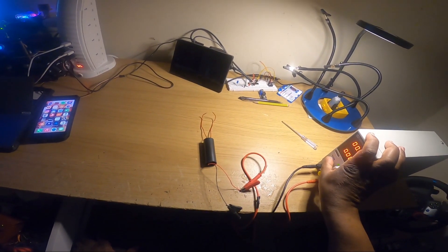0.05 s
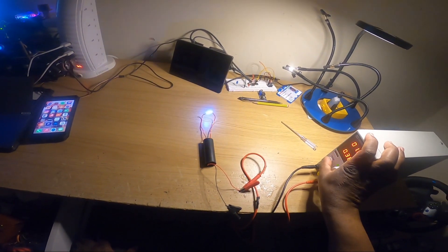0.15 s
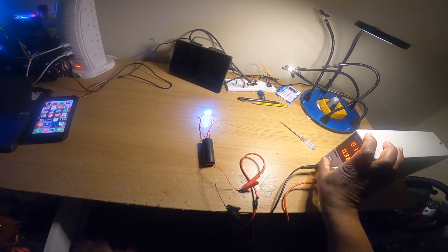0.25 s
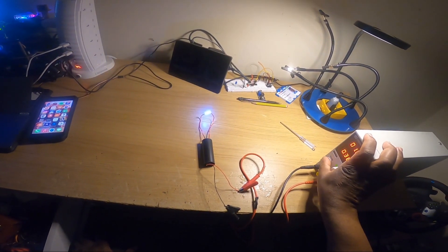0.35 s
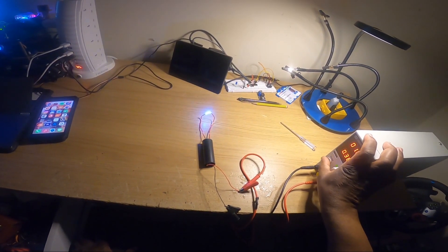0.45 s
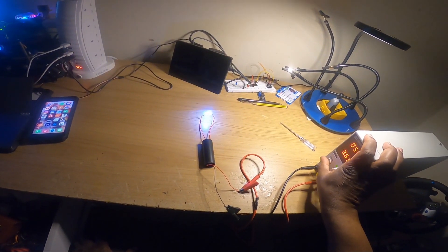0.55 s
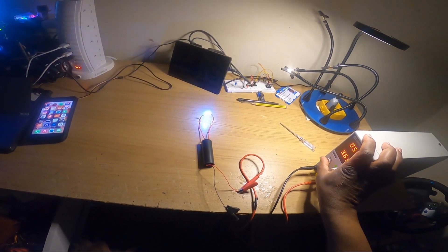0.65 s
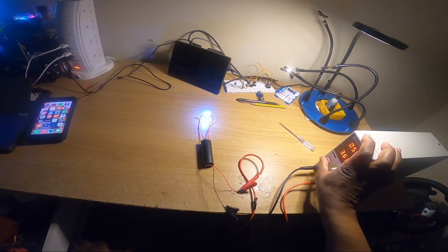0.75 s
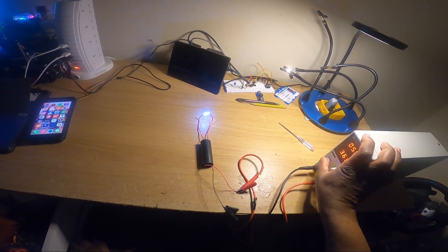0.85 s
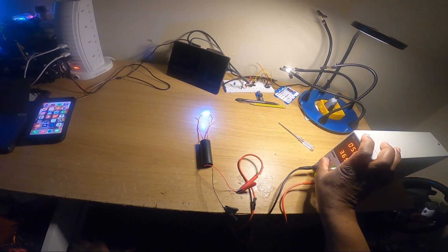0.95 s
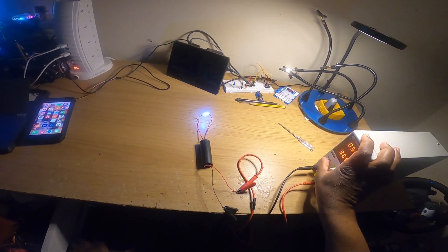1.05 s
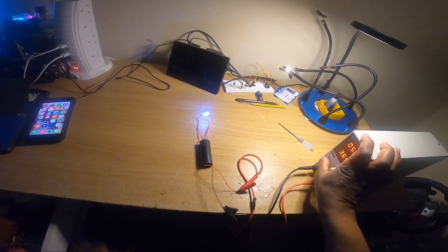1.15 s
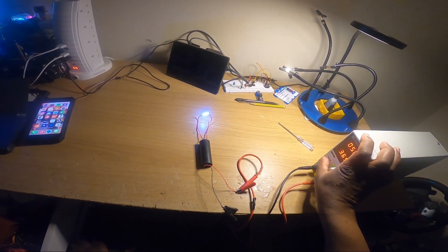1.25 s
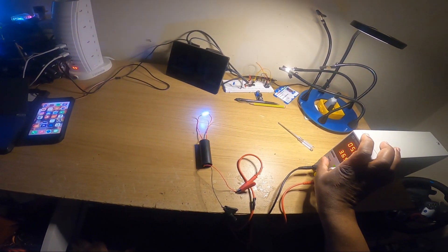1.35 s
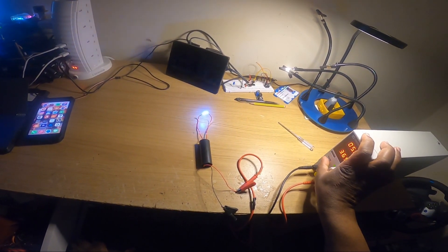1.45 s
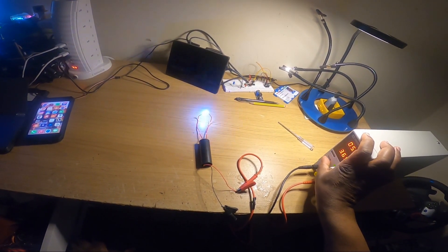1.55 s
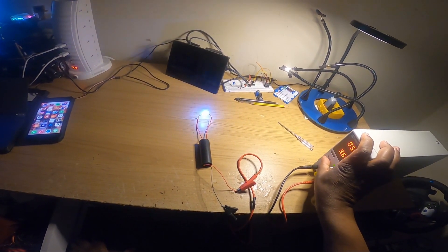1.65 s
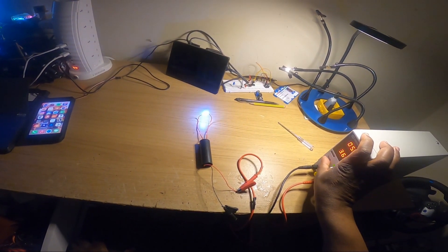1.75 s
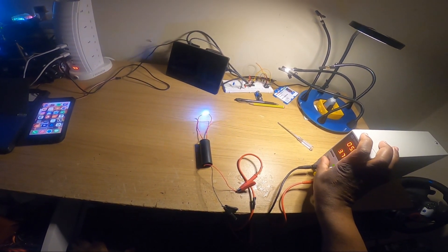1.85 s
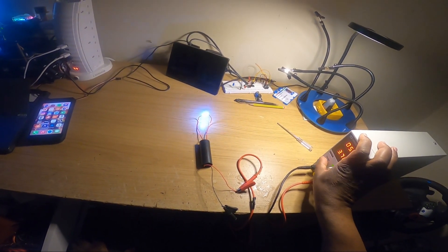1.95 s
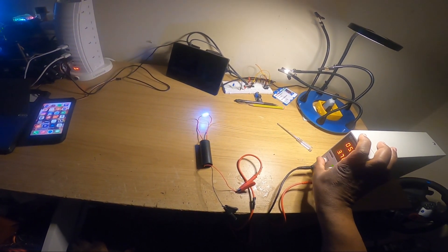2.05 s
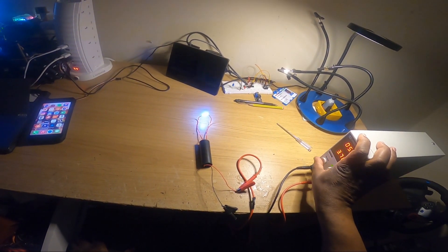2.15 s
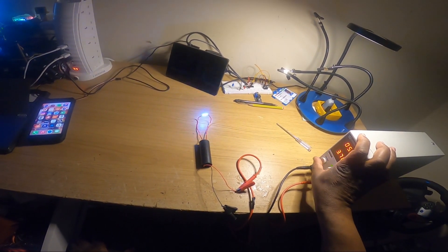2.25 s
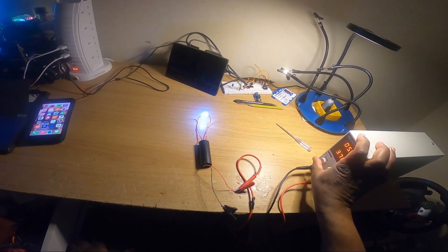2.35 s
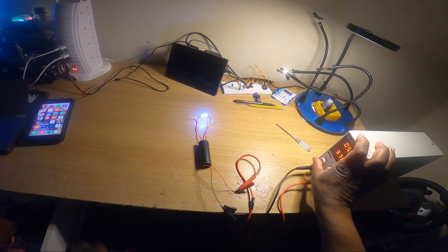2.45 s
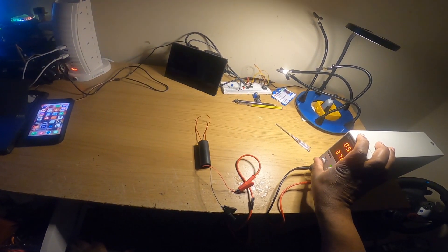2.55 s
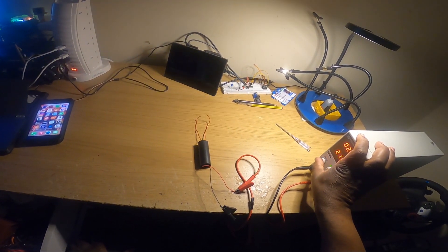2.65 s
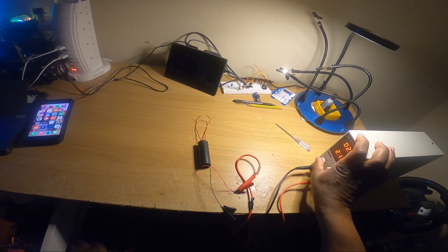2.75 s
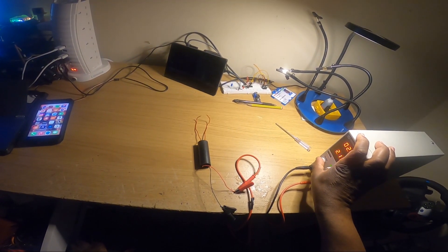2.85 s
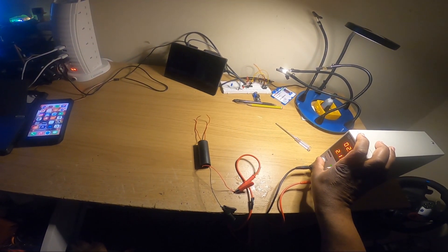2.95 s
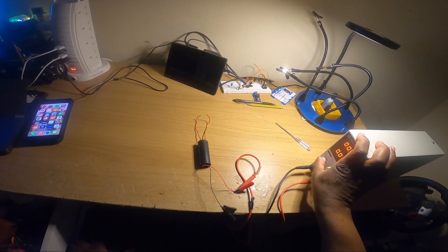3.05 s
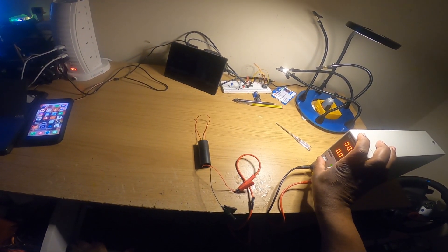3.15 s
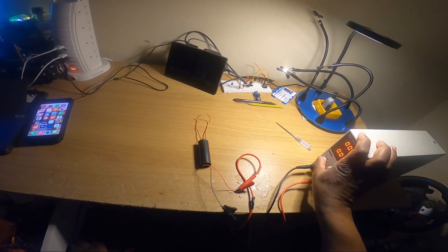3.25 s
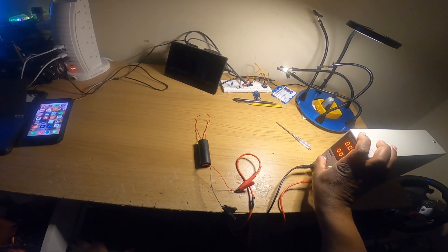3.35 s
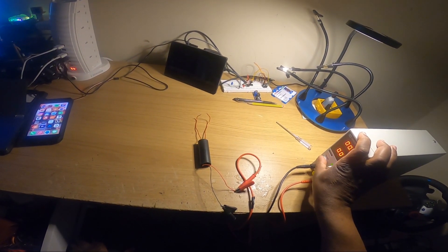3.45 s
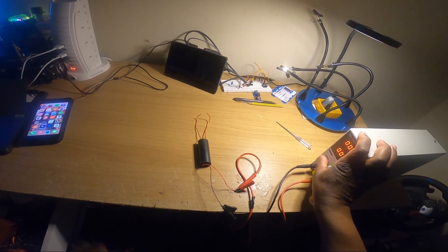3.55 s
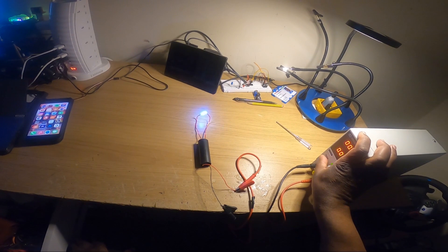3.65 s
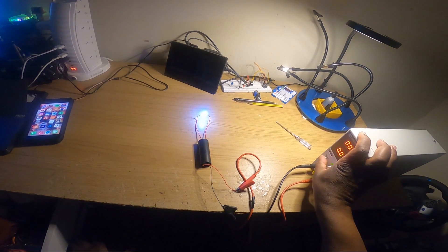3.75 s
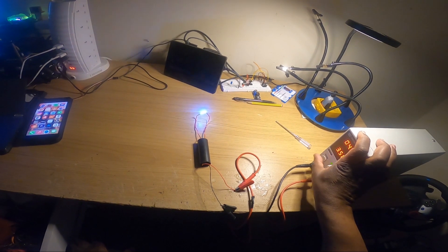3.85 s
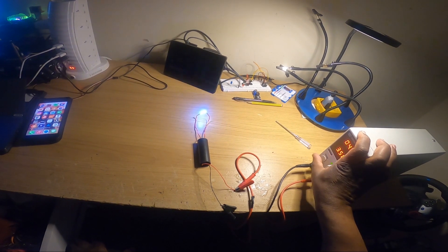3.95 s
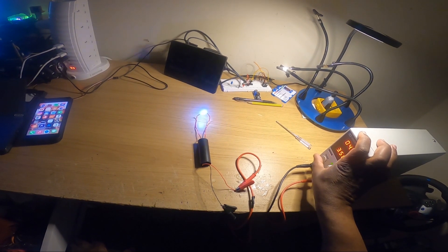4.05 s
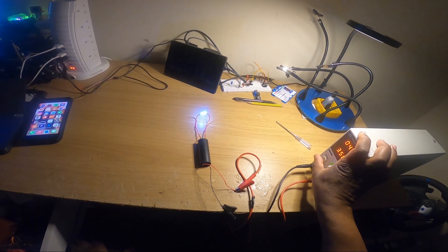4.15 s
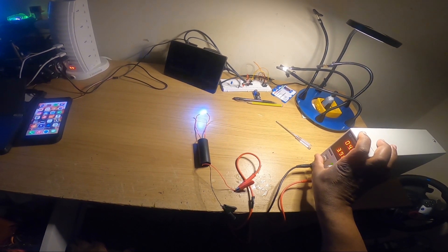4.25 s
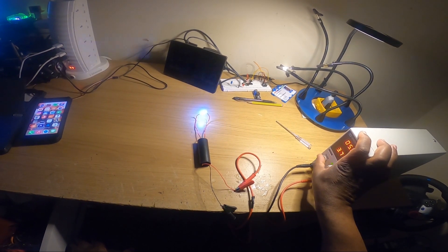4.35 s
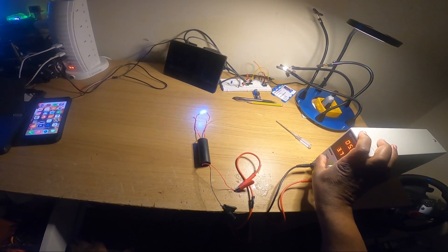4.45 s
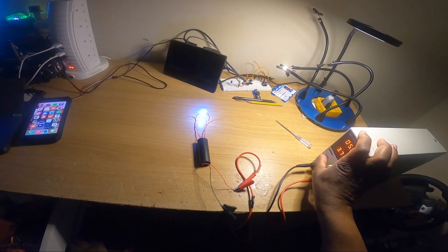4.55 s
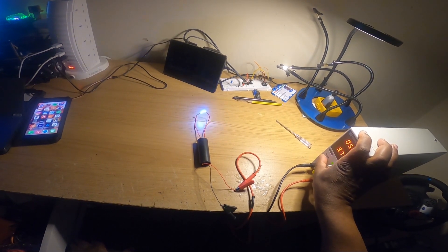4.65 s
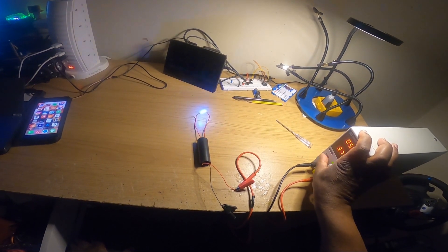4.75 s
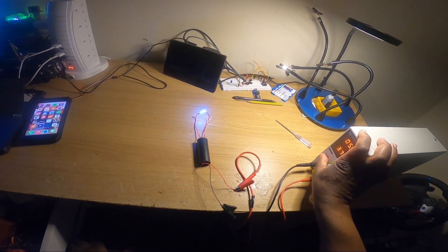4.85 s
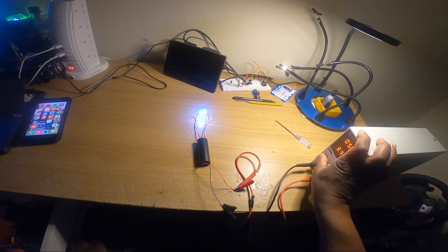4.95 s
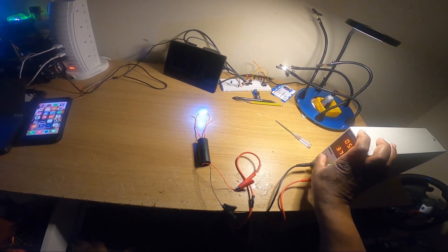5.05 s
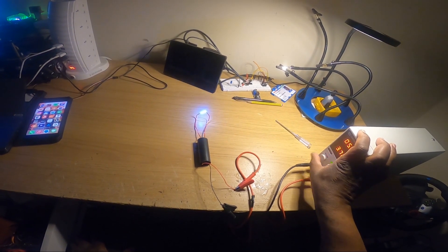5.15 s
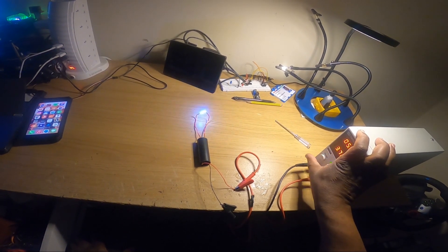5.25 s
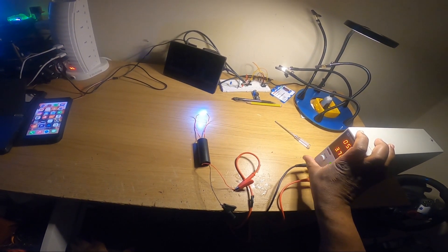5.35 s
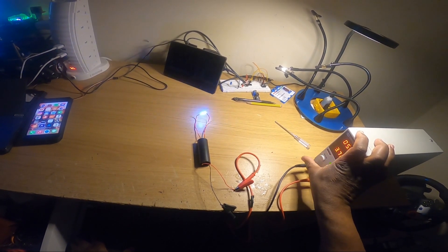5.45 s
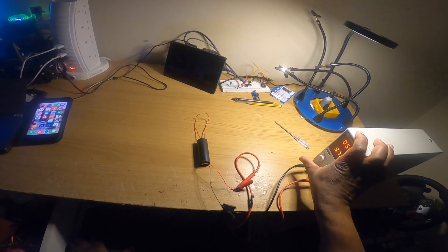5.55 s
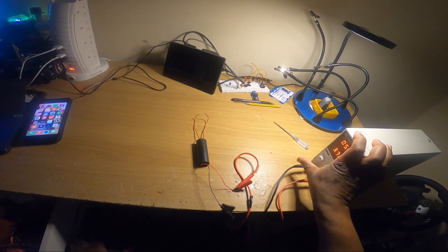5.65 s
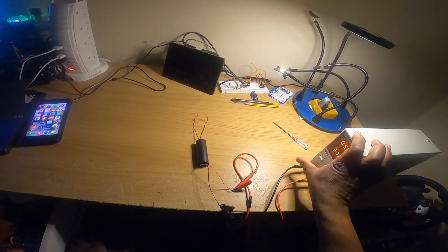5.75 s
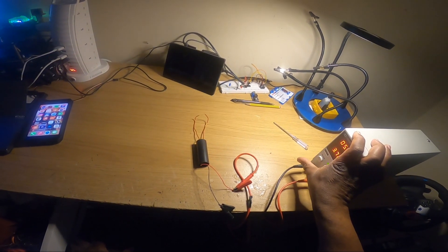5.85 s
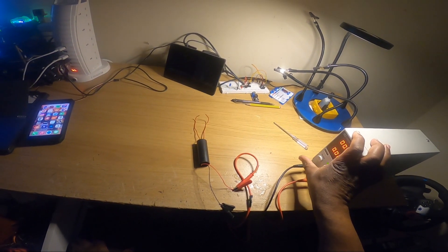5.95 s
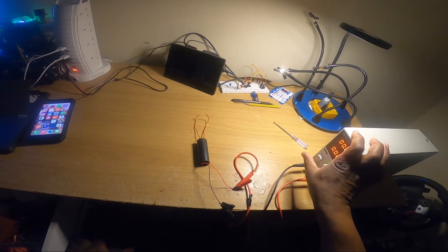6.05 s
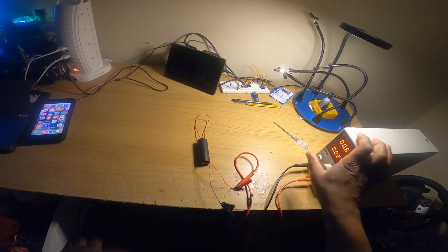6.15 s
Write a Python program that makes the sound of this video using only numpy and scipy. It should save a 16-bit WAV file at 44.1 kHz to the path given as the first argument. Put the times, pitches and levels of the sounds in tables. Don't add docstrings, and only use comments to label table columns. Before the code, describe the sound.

A firm plastic click and a softer tick, then a high-voltage coil on a wooden bench erupts into a harsh, rapid crackling buzz for over two seconds. It stops dead; faint release ticks and low rumble fill a second's gap. A second similar burst follows, then near silence. Close microphone, small room, thumped and slightly overloaded by each spark.

```python
import sys
import numpy as np
from scipy import signal
from scipy.fft import rfft, irfft
from scipy.io import wavfile
from scipy.ndimage import uniform_filter1d

SR = 44100
rng = np.random.default_rng(int(sys.argv[2]) if len(sys.argv) > 2 else 0)


def generate_wav(sig):
    pcm = np.round(np.clip(np.atleast_2d(sig).T, -1, 1) * 32767).astype(np.int16)
    wavfile.write(sys.argv[1], SR, pcm)


def undo_db(level):
    steps = np.asarray(level, float) / 20
    return 10 ** steps


N = 273541

# time_s, rate_sparks_per_s, wander_0_to_1 (share of weak wandering strikes)
SPARK_BURSTS = [
    [(0.3005, 54.0, 0.06), (0.3772, 70.74, 0.03), (0.3971, 90.59, 0.53), (0.9036, 78.78, 0.26),
     (1.0257, 86.53, 0.41), (1.3012, 86.05, 0.16), (1.4056, 77.86, 0.07), (2.0231, 91.37, 0.51),
     (2.6131, 81.69, 0.38)],
    [(3.7288, 51.09, 0.03), (3.833, 82.5, 0.59), (4.0702, 84.07, 0.46), (4.09, 90.15, 0.45),
     (4.7264, 89.52, 0.6), (5.2881, 76.86, 0.06), (5.409, 83.1, 0.11), (5.6113, 75.44, 0.03),
     (5.703, 76.27, 0.04)],
]


def evened(x):
    return x / np.sqrt(np.mean(x ** 2) + 1e-20)


def read(points, hz):
    f, value = np.transpose(points)
    return np.interp(np.log(hz + 1), np.log(f + 1), value)


def shaped(x, points):
    hz = np.fft.rfftfreq(x.shape[-1], 1 / SR)
    return irfft(rfft(x) * undo_db(read(points, hz)), x.shape[-1])


def train(times_s, sizes):
    return np.bincount(np.round(times_s * SR).astype(int), sizes, N)[:N]


def struck(times_s, sizes, response):
    return signal.oaconvolve(train(times_s, sizes), response)


def burst(u, width_s, hz):
    return np.exp(-(u / width_s) ** 2) * np.cos(2 * np.pi * hz * u)


def firing(rows):
    crack_level_db, dip_level_db = -29, -21
    fresh_crack_db, fresh_dip_db, settle_s = 2.5, 1, .075
    wander_db, first_db = -3, 6.2
    early_s, jitter_s, pull_back = .0008, .0011, .3

    time_s, rate, wander = np.transpose(rows)
    clock_s = np.arange(time_s[0], time_s[-1], 1 / SR)
    fired = np.cumsum(np.interp(clock_s, time_s, rate)) / SR
    k = np.arange(round(fired[-1]) + 1)
    due_s = np.interp(k, fired, clock_s)
    wander = np.interp(due_s, time_s, wander)
    timing, place, miss, landing = rng.random((len(k), 4)).T

    missed = (miss < wander) & (k > 0) & (k < k[-1])
    error_s = jitter_s * np.sqrt(12) * (timing - .5) * (.4 + wander)
    error_s = error_s - early_s * (missed - wander)
    ends = np.clip(np.minimum(k, k[-1] - k) / 4, 0, 1)
    t = due_s + ends * signal.lfilter([1], [1, pull_back - 1], error_s)

    fresh = np.exp(-(t - t[0]) / settle_s)
    charge_db = 300 * (np.diff(t, prepend=t[0] - .012) - .012)
    crack_db = crack_level_db + fresh_crack_db * fresh + wander_db * wander + first_db * (k == 0)
    crack = undo_db(crack_db + charge_db.clip(-2, 1) + 2.4 * (place - .5))
    dip = undo_db(dip_level_db + fresh_dip_db * fresh)
    weak = np.where(landing < .07, -.4, .2 + .5 * landing)
    landed = np.where(missed, weak, .8 + .36 * landing)
    return t, crack, dip, landed, place


def tail(colour, ring=1.7, build_s=0.00092):
    # centre_hz, width_hz, level_db
    bench_modes = [(3445, 1400, -11), (4773, 160, -4), (5950, 96, -24), (6686, 330, -7), (6960, 76, -32.5),
                   (7580, 140, -3), (7960, 150, -16), (9720, 160, 8.5), (10710, 220, -4)]
    # frequency_hz, t60_s
    decay = [(300, .33), (1000, .54), (2800, .56), (4700, .46), (8500, .4), (12500, .25)]
    size = SR * 3 // 5
    age_s = np.arange(size) / SR
    f = np.fft.rfftfreq(size, 1 / SR)
    bumps = 1 + sum(ring * undo_db(db) / (1 + (2 * (f - c) / w) ** 2) for c, w, db in bench_modes)
    noise = irfft(rfft(shaped(rng.standard_normal(size), colour)) * bumps, size)
    hz, t, z = signal.stft(noise, SR, nperseg=256)
    fade = undo_db(-60 * t / read(decay, hz)[:, None])
    x = signal.istft(z * fade, SR, nperseg=256)[1][:size]
    x = x * (1 - np.exp(-age_s / build_s))
    x = x * undo_db(-22 * (age_s / .4) ** 3)
    return x / np.linalg.norm(x)


def cracks(t, size, place):
    # frequency_hz, spread_s, level_db
    shock_bands = [(8300, 0.00039, -2.5), (3640, 0.00033, -11), (10520, 0.00034, -11), (6170, 0.00037, -9),
                   (678, 0.00061, -11), (7790, 0.00019, -6.5), (4710, 0.00074, -9.5),
                   (3264, 0.00059, -12.5), (7230, 0.00042, -12), (6050, 0.00021, -23),
                   (2330, 0.00029, -13.5), (3240, 0.00057, -16), (11200, 0.00013, -21.5),
                   (1735, 0.0004, -20)]
    arrivals_s = 0, -.0001, 0, 0, .0005, .0009, .0011, -.0001, .0037, .0047, -.0003, .0017, .0012, -.0003
    # frequency_hz, density_db_per_hz
    wet_colour = [(200, -42.5), (400, -8), (700, -2.5), (1000, -3.5), (1500, -5), (2200, -3.5),
                  (3300, -3.5), (8200, -2.5), (10500, -11.5), (12500, -10), (15500, -32)]
    # frequency_hz, side_over_mid_db
    side_colour = [(60, -50), (150, -40), (300, -28), (700, -26), (1400, -31), (2800, -32), (5600, -30),
                   (10000, -27), (14000, -20)]

    lead = 64
    u = (np.arange(400) - lead) / SR
    near = sum(undo_db(db) * burst(u - s, w, hz) for (hz, w, db), s in zip(shock_bands, arrivals_s))
    direct = undo_db(18.5) * struck(t, size, near)[lead:N + lead]

    size = np.minimum(size, 1.5 * np.median(size))
    first_s, second_s = [rows[0][0] for rows in SPARK_BURSTS]
    age_s = t - np.where(t < second_s, first_s, second_s)
    air = burst(u, 0.00027, 13800)
    direct = direct + undo_db(3.5) * struck(t, size / (1 + (age_s / 0.26) ** 4), air)[lead:N + lead]

    share = np.clip(0.53 * place, 0, 1)
    gains = np.sqrt(1 - share), np.sqrt(share)
    wet = sum(struck(t, size * g, tail(wet_colour))[:N] for g in gains)
    side = shaped(struck(t, size, tail(wet_colour))[:N], side_colour)
    side = undo_db(38) * side * np.array([[1], [-1]])
    return direct + undo_db(28.0) * wet + side


def dips(t, size, landed, place):
    out = np.zeros(N)
    late = 1 - np.clip(abs(landed), 0, 1)
    for s, depth, lag in zip(t, size * landed, late):
        u = np.linspace(0, 1, int((.0044 + .003 * lag) * SR))
        start = int((s + .0006 + .0018 * lag) * SR)
        end = start + len(u)
        out[start:end] -= depth * np.sin(np.pi * u ** 0.67) ** 2
        out[end:end + len(u)] += .9 * lag * depth * np.sin(np.pi * u) ** 2

    u = np.arange(-90, 90) / SR
    snap_size = size * landed ** 2 * (0.36 + 1.5 * place ** 2)
    out += undo_db(-13) * struck(t - .0018, snap_size, burst(u, .0005, 720))[:N]

    gap_s = uniform_filter1d(np.diff(t, prepend=0).clip(0, .014), size=21)
    hurried = np.clip((.0119 - gap_s) / .0008, 0, 1)
    out += undo_db(-15.5) * struck(t - .0024, size * hurried * place, burst(u, 0.0013, 1350))[:N]

    u = np.arange(4000) / SR
    wobble = undo_db(-60 * u / 0.074) * np.sin(2 * np.pi * 108 * u)
    out -= undo_db(5.5) * struck(t, (size - np.median(size)).clip(0), wobble)[:N]

    turn, sharp = 2 * np.pi * 30 / SR, 1.05
    b, a = signal.bilinear([1, 0, 0], [1, turn / sharp, turn ** 2], fs=1)
    return undo_db(11.5) * signal.lfilter(b, a, out)


def button():
    # start_s, peak_db, brightness_db
    clicks = [
        (0.038, -15.5, -7),
        (0.188, -27.5, -12),
        (3.008, -38.5, -28),
        (3.029, -41, -33),
        (3.071, -36, -30),
        (3.094, -40, -43),
        (3.137, -41.5, -27),
        (3.612, -59, -50),
    ]
    # frequency_hz, level_db, t60_s
    modes = [(700, 0, .035), (640, -6, .025), (830, -6, .02), (1020, -3, .03), (1250, -6, .02),
             (1500, -7, .02), (2300, -10, .015)]
    # frequency_hz, density_db_per_hz
    snap_colour = [(300, -24), (1000, -13), (2500, -14.5), (4500, -5), (5400, -15.5), (6400, -9.5),
                   (10000, -20), (15500, -29)]
    u, knock, snap = np.arange(6000) / SR, np.zeros(N), np.zeros(N)
    for s, db, bright_db in clicks:
        ring = sum(undo_db(d - 60 * u / t60) * np.sin(2 * np.pi * hz * rng.uniform(1.0, 1.03) * u)
                   for hz, d, t60 in modes)
        tilt = [(2500, 0), (7000, bright_db + 8)]
        noise = evened(shaped(rng.standard_normal(len(u)), snap_colour))
        puff = undo_db(-4.0 - 60 * u / 0.025) * shaped(noise, tilt)
        span = slice(round(s * SR), round(s * SR) + len(u))
        knock[span] += undo_db(db - 6) * ring * (1 - np.exp(-u / 0.0017))
        snap[span] += undo_db(db - 1 + .3 * bright_db) * puff * (1 - np.exp(-u / 0.00084))
    room = tail([(100, 0), (15000, 0)], ring=0)
    room = room * undo_db(6.5 - 110 * np.arange(len(room)) / SR)
    return knock + snap + signal.oaconvolve(undo_db(-8.5) * knock + undo_db(-4) * snap, room)[:N]


def whine():
    # time_s, pitch_hz, level_db
    glide = [(0.231, 8300, -75), (.25, 8150, -60), (.268, 8280, -75), (0.279, 8900, -66.5)]
    s, hz, db = np.transpose(glide)
    t = np.arange(N) / SR
    phase = 2 * np.pi * np.cumsum(np.interp(t, s, hz)) / SR
    return undo_db(np.interp(t, s, db, -120, -120)) * np.sin(phase)


def background(loud):
    # time_s, spread_s, rumble_db, drone_db
    stirs = [
        (0, 0.12, -51, -66),
        (.27, 0.065, -46.5, -65),
        (2.74, 0.13, -64, -64.5),
        (3.2, 0.3, -53.5, -81),
        (2.97, .08, -63, -80.5),
        (3.71, .05, -51.5, -57),
        (5.78, 0.083, -64.5, -64),
    ]
    # frequency_hz, density_db_per_hz
    rumble_colour = [(12, -23.5), (25, -10.5), (48, 5), (80, -11), (120, -35), (500, -77)]
    drone_colour = [(60, -30), (110, 0), (160, 1), (260, -12.5), (400, -18.5), (1000, -36.5)]
    fan_colour = [(300, -10), (900, -10), (1450, 0), (1900, -12), (2600, -8), (3200, -20), (6000, -32),
                  (15000, -45)]
    t = np.arange(N) / SR
    s, spread, rumble_db, drone_db = np.transpose(stirs)
    swell = np.exp(-((t[:, None] - s) / spread) ** 2)
    rumble_level = undo_db(-72.5) + swell @ undo_db(rumble_db)
    drone_level = undo_db(-74) + swell @ undo_db(drone_db)
    rumble = rumble_level * evened(shaped(rng.standard_normal(N), rumble_colour))
    drone = drone_level * evened(shaped(rng.standard_normal(N), drone_colour))
    last_loud_s = np.maximum.accumulate(np.where(abs(loud) > .05, t, 0))
    gate = undo_db(-16) + uniform_filter1d((t - last_loud_s < .29) * 1., int(.08 * SR))
    fan = undo_db(-62.0) * gate * evened(shaped(rng.standard_normal(N), fan_colour))
    return rumble + drone + fan


def smeared(x):
    frame, grid = 2048, 435
    pad = frame // 2 - grid
    window = np.sin(np.pi * (np.arange(frame) + .5) / frame)
    hz, t, z = signal.stft(np.pad(x, ((0, 0), (pad, 0))), SR, window, frame, frame // 2)
    step_db = -0.5 + read([(250, -32.5), (700, -0.5), (3000, -1), (12000, -0.5)], hz)
    step = undo_db(step_db)[:, None] * np.sqrt(abs(uniform_filter1d(abs(z) ** 2, size=24, axis=1)))
    floor_db = read([(1500, -130), (3500, -108), (9000, -102)], hz)
    step = np.maximum(step, undo_db(floor_db)[:, None])
    z = step * (np.round(z.real / step) + 1j * np.round(z.imag / step))
    return signal.istft(z, SR, window, frame, frame // 2)[1][:, pad:pad + N]


def lead_in():
    # frequency_hz, density_db_per_hz
    lead_colour = [(400, -18.5), (800, -5.5), (1700, -7), (2800, 1.5), (4500, -0.5), (6200, -12),
                   (7400, 4), (9000, -16), (10500, -5), (13000, -16)]
    out, u = np.zeros(N), np.arange(-2000, 0) / SR
    hz = np.fft.rfftfreq(len(u), 1 / SR)
    swell = np.exp(u / 0.01) * np.minimum(1, (u - u[0]) / 0.025)
    for rows, db in zip(SPARK_BURSTS, (-15, -19)):
        bands = undo_db(5 * evened(uniform_filter1d(rng.standard_normal(len(hz)), size=11)))
        noise = shaped(rng.standard_normal(len(u)), lead_colour)
        noise = evened(irfft(rfft(noise) * bands, len(u)))
        end = round(rows[0][0] * SR)
        out[end - len(u):end] += undo_db(db) * noise * swell
    return out


def scene():
    t, crack, dip, landed, place = np.hstack([firing(rows) for rows in SPARK_BURSTS])
    push = dips(t, dip, landed, place)
    return cracks(t, crack, place) + push + button() + whine() + background(push)


def low_pass(x):
    return signal.sosfilt(signal.butter(12, 15770, fs=SR, output="sos"), x)


def record(dry):
    mid_side = np.array([[1, 1], [1, -1]]) / np.sqrt(2)
    overloaded = np.tanh(dry / 1.3) * 1.25
    mix = mid_side @ smeared(mid_side @ overloaded) + lead_in()
    return low_pass(mix)


dry = scene()
out = record(dry)
generate_wav(out)
```